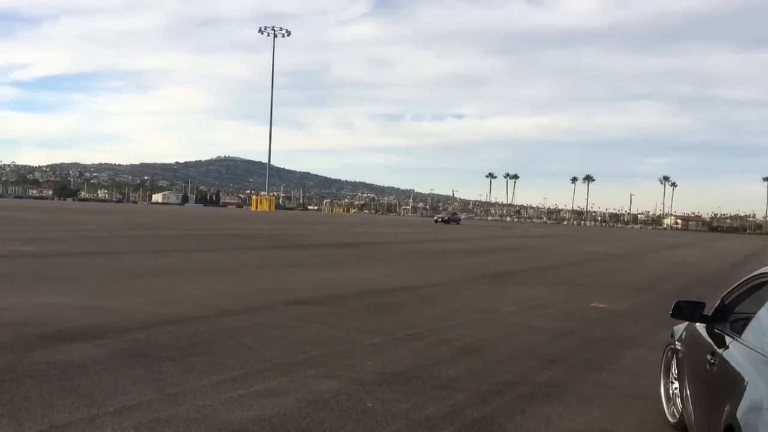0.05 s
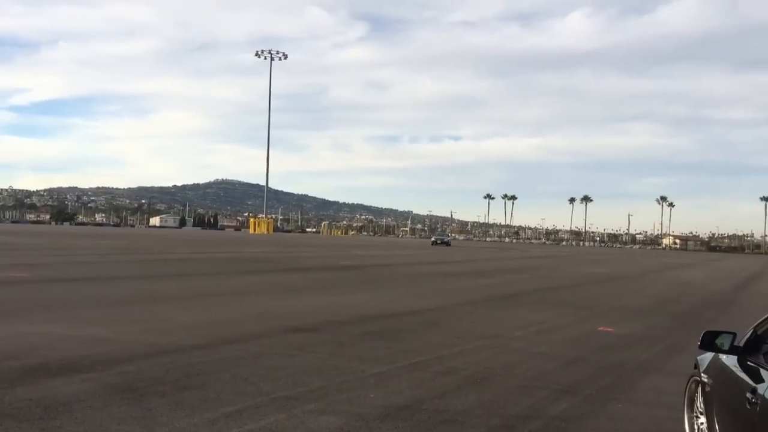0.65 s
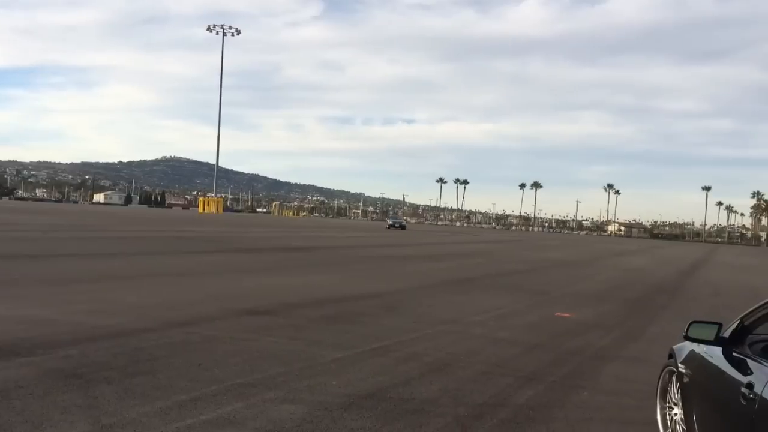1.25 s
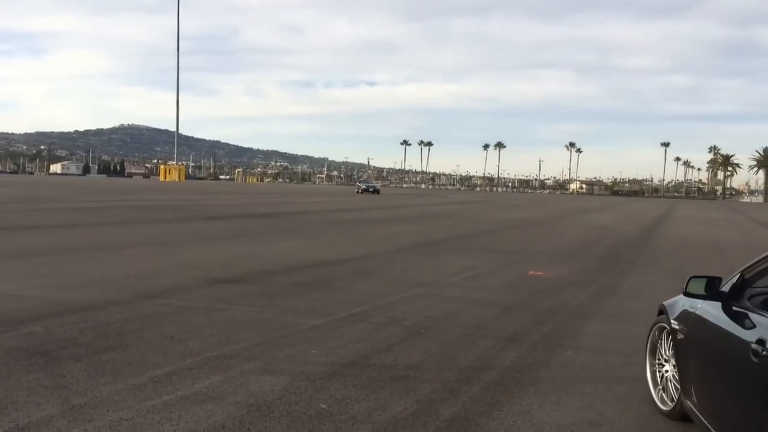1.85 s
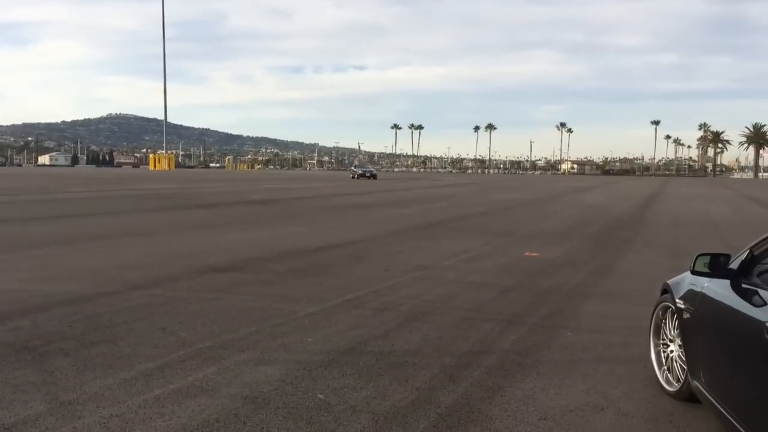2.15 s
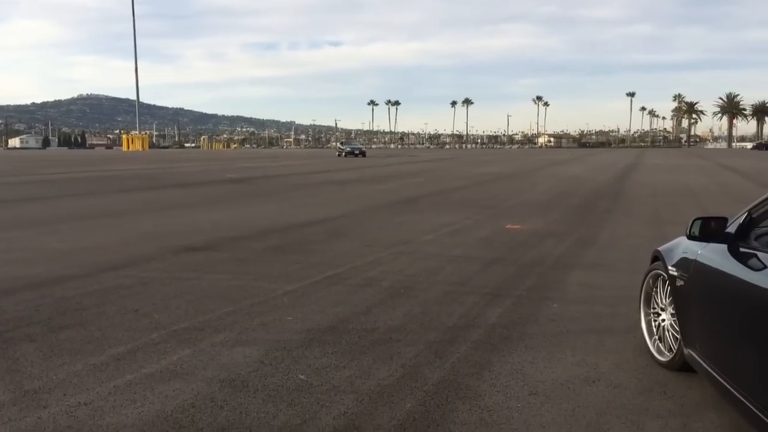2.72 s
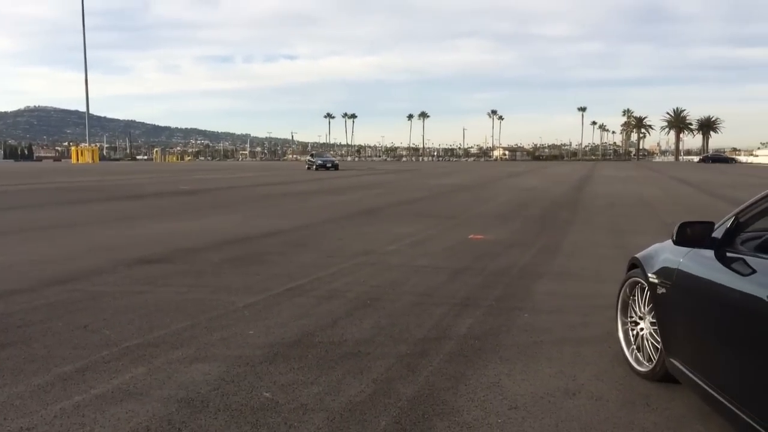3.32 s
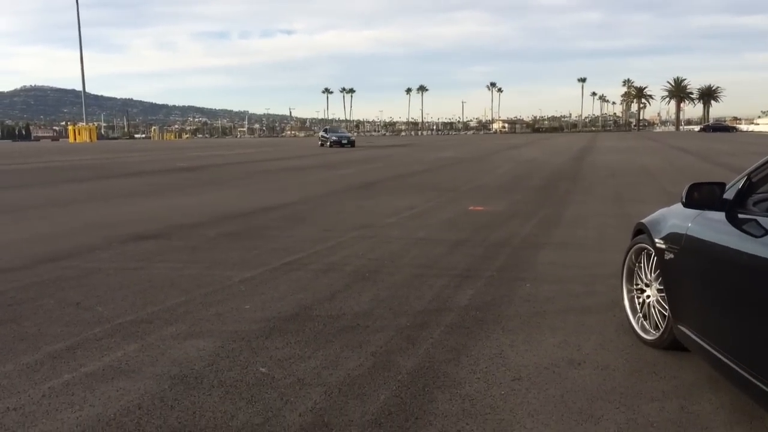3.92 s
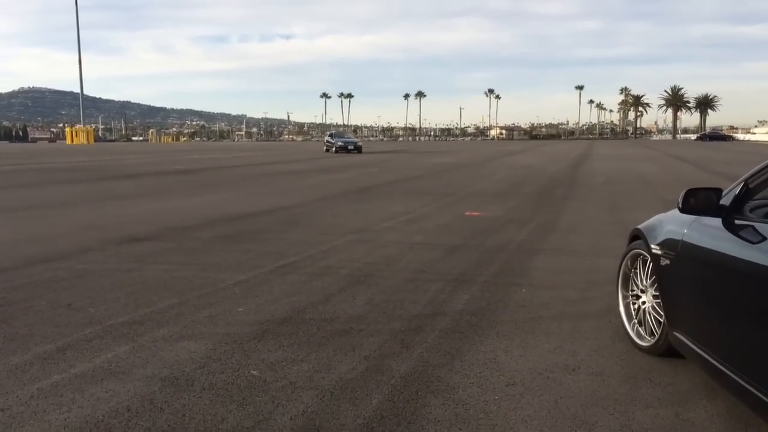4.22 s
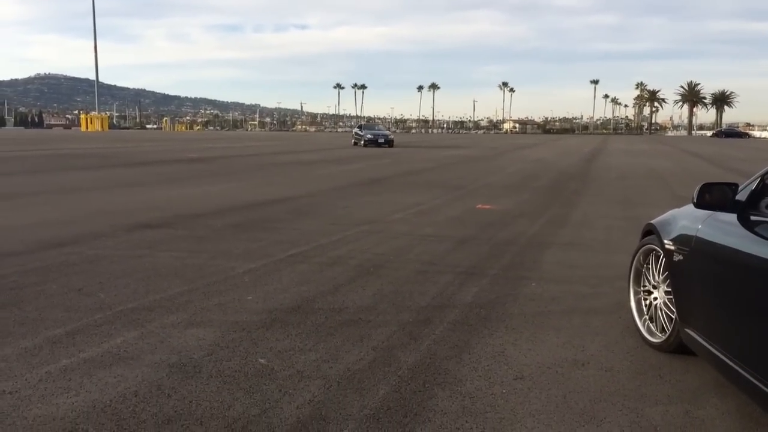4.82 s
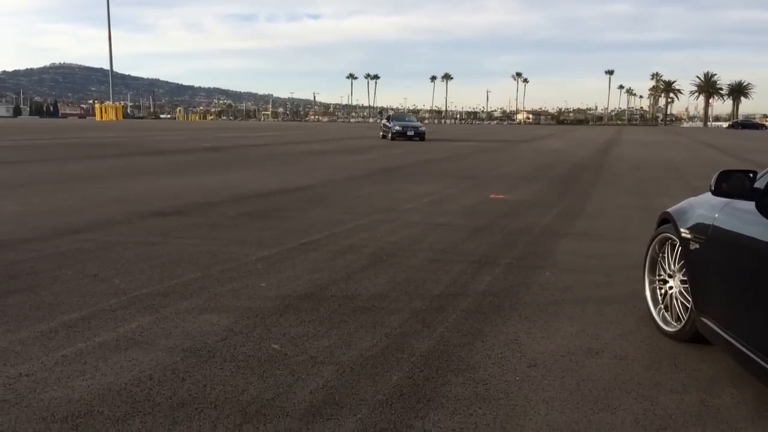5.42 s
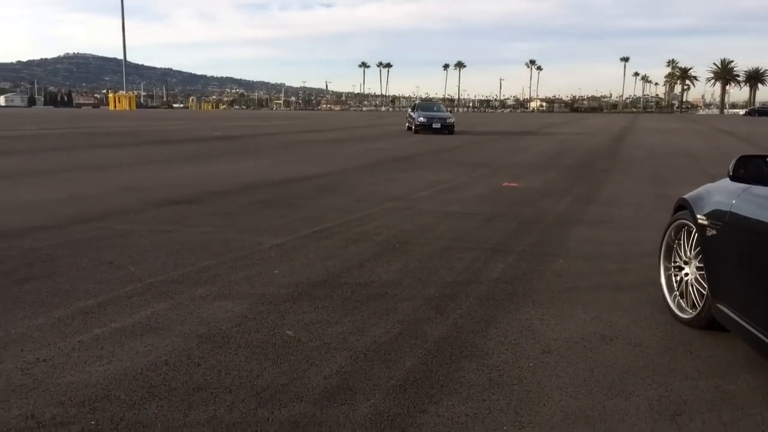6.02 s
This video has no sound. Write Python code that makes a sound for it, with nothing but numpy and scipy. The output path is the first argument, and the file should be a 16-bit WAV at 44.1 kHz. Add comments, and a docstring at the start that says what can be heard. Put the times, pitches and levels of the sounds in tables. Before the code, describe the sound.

A V8 car with open exhaust pipes approaches across a wide asphalt lot, over soft outdoor air and a deep hum. For the first second it is distant, with a ragged, lumpy low rumble. Dull thuds dot the rumble throughout. From about 1.2 seconds the engine revs up quickly, then climbs more slowly from 2 to 5 seconds, its note booming and growing louder. Exhaust rasp, clatter and metallic ringing build as it nears. Tyre and intake hiss come forward from about 3.5 seconds, and two faint, thin whistles swell and fade around 3.6 and 4.2 seconds. Tiny scuffs occur close to the microphone near 1 and 3 seconds, with a much clearer one at 4.7 seconds. Just after 5 seconds the throttle eases, picks up briefly and eases again, with the car still loud at the end, around 6 seconds.

```python
"""A V8 car with open pipes drives across a wide asphalt lot towards the listener, revs up, then eases off.
Its firing note booms as it sweeps through the pipe resonances, over a lumpy rumble with dull thuds.
Rasp, clatter, metallic ringing and tyre and intake hiss grow as it nears; two thin whistles come and go.
A few short scuffs stick and slip close to the microphone. Behind it all lie open air and a deep hum."""
import sys
import numpy as np
from scipy import signal
from scipy.fft import rfft, irfft, next_fast_len
from scipy.io import wavfile
from scipy.ndimage import uniform_filter1d, map_coordinates

SR = 44100
rng = np.random.default_rng(int(sys.argv[2]) if len(sys.argv) > 2 else 0)


def store_wav(level_fs):
    """Save 16-bit WAV to argv[1]."""
    pcm = np.round(np.clip(np.atleast_2d(level_fs), -1, 1) * 32767)
    wavfile.write(sys.argv[1], SR, pcm.T.astype(np.int16))


N = 267687
TIME = np.arange(N) / SR


def from_db(db):
    return 10 ** (np.asarray(db) / 20)


def rms_one(x):
    return x / np.sqrt(np.mean(x ** 2) + 1e-20)


def automation(curve):
    """A breakpoint curve, read at every sample."""
    return np.interp(TIME, *np.transpose(curve))


def gain_at(spectrum, hz):
    """Gain of an EQ curve, read on a log-frequency axis."""
    points_hz, points_db = np.transpose(spectrum)
    return from_db(np.interp(np.log(hz + 1e-3), np.log(points_hz), points_db))


def coloured(x, spectrum):
    """A sound shaped by an EQ curve; rms 1."""
    size = next_fast_len(N)
    gain = gain_at(spectrum, np.fft.rfftfreq(size, 1 / SR))
    return rms_one(irfft(rfft(x, size) * gain, size)[:N])


def drift(rate):
    """Smooth random modulation that changes `rate` times a second; rms 1."""
    knots = rng.standard_normal(2048)
    coarse_s = np.linspace(0, TIME[-1], 4000)
    curve = map_coordinates(knots, [coarse_s * rate], order=3, mode="wrap")
    return np.interp(TIME, coarse_s, rms_one(curve))


def steadied(x, span_s):
    """A leveller: evens out swells slower than the span."""
    return x / np.sqrt(uniform_filter1d(x ** 2, int(span_s * SR)) + 1e-9)


# colour of the air bed: (frequency [Hz], level [dB])
AIR_EQ = [(100, 17.5), (500, 19), (1000, 5), (2000, 1), (4000, -10), (7000, -8.5), (10000, -11),
          (15000, -14)]
def open_air(level_db):
    """A steady, dark bed of outdoor noise."""
    return from_db(level_db) * coloured(rng.standard_normal(N), AIR_EQ)


def deep_hum(hz, level_db):
    """A low sine that wavers in level and phase."""
    gain = np.sqrt(2) * from_db(level_db + 2.8 * drift(4.2))
    return gain * np.sin(2 * np.pi * hz * TIME + 0.73 * drift(7.7))


# colour of the grit: (frequency [Hz], level [dB])
GRIT_EQ = [(300, 1.5), (700, 15), (1050, 20), (2000, 2), (3500, 6.5), (5000, -2.5), (7000, -2.5),
           (10000, -16.5), (15000, -18)]
# scuff cues: (middle [s], level [dB], half length [s], centre [Hz], grit mix [dB], slip rate [1/s])
SCUFF_CUES = [(0.97, -49, 0.0076, 1360, -18, 68), (1.132, -54, 0.0058, 2210, -0.5, 110),
              (2.941, -60, 0.0052, 2430, -3, 110), (3.014, -65.5, 0.0078, 2560, 12.5, 110),
              (4.281, -59, .0031, 2950, 10, 110), (4.667, -28.5, 0.013, 1660, -7, 110)]
def scuffs(band_ratio, slip_depth):
    """Short runs of stick and slip: a steep-sided resonance with gritty hiss around it."""
    out, white = np.zeros(N), rng.standard_normal(N)
    grit = coloured(rng.standard_normal(N), GRIT_EQ) * from_db(0.5 * drift(340))
    for middle_s, level_db, half_s, hz, grit_db, slips_per_s in SCUFF_CUES:
        band = signal.butter(4, [hz / band_ratio, hz * band_ratio], "band", fs=SR, output="sos")
        body = steadied(signal.sosfilt(band, white), span_s=0.0091)
        near = np.abs(TIME - middle_s) < 0.1
        t = TIME[near] - middle_s
        swell = np.exp(-(t / (2 * half_s)) ** 4)
        slips = 1 + slip_depth * np.cos(2 * np.pi * slips_per_s * t)
        out[near] += from_db(level_db) * swell * slips * (body[near] + from_db(grit_db) * grit[near])
    return out


# dull hits in the rumble: (time [s], level [dB])
THUD_CUES = [(0.023, -7), (0.259, -7), (0.597, -6), (.737, -9), (0.924, -10.5), (1.093, -10.5), (1.57, -12),
             (1.905, -7.5), (2.075, -9.5), (2.717, -12.5), (3.089, -19), (4.388, -10), (4.594, -10),
             (5.199, -22.5), (5.275, -11), (5.593, -12.5), (5.889, -11)]
def thuds(hz, t60_s, rise_s):
    """Each thud is a cycle or two of a low, heavily damped swing."""
    out = np.zeros(N)
    for start_s, level_db in THUD_CUES:
        pitch_hz = hz * (1 + 0.038 * rng.standard_normal())
        near = (TIME > start_s) & (TIME < start_s + 0.2)
        age = TIME[near] - start_s
        envelope = 2 * (1 - np.exp(-age / rise_s)) * from_db(level_db - 60 * age / t60_s)
        out[near] += envelope * np.sin(2 * np.pi * pitch_hz * age)
    return out


# the revs: (time [s], engine speed [four-stroke cycles/s])
REVS = [(0, 11.55), (1.2, 12.83), (1.5, 15.8), (2, 19.24), (2.5, 20.26), (3.2, 21.97), (3.85, 22.98),
        (5.07, 24.15), (5.3, 22.81), (5.48, 23.75), (5.7, 23.24), (6.07, 23.05)]
def crank(wobble):
    """Engine cycles turned so far; the speed is never quite steady."""
    return np.cumsum(automation(REVS) * (1 + wobble * drift(14))) / SR


def surge(hard_cycles_per_s2=11.6):
    """How fast the revs are changing, up or down; 1 in a hard surge."""
    change = np.abs(np.gradient(automation(REVS))) * SR
    return uniform_filter1d(change, SR // 8) / hard_cycles_per_s2


def raggedness(smooth_cycles_per_s=20.5, span_cycles_per_s=5.3):
    """Low revs fire raggedly: 0 when smooth, 1 when fully ragged."""
    return np.clip((smooth_cycles_per_s - automation(REVS)) / span_cycles_per_s, 0, 1)


START_M, CLOSING_M_PER_S = 102.5, 12.4
# the driver's foot: (time [s], throttle [0-1])
PEDAL = [(0, 0), (1.15, 0.35), (1.85, 0.92), (2.4, 0.88), (3.0, 0.76), (3.4, 0.72), (3.8, 0.96),
         (4.9, 0.88), (5.3, 0.52), (5.85, 0.72), (6.07, 0.3)]
def approach_gain(fader):
    """A layer's fader ride: it grows as the car nears and as the throttle opens."""
    far_db, halving_db, throttle_db = fader
    halvings = np.log2(START_M / (START_M - CLOSING_M_PER_S * TIME))
    return from_db(far_db + halving_db * halvings + throttle_db * automation(PEDAL))


def cycle_buzz(cycles, morph_rate, size=4096):
    """A pressure pattern that repeats each engine cycle and slowly morphs: a comb of engine orders."""
    out = 0
    for _ in range(4):
        pattern = irfft(np.exp(2j * np.pi * rng.random(size // 16)), size)
        out += drift(morph_rate) * np.interp(cycles % 1 * size, np.arange(size), pattern)
    return steadied(out, span_s=0.51)


def engine_band(cycles, spectrum, buzz_db, throb):
    """Engine orders plus turbulence that puffs at each firing and swells twice a cycle; rms 1."""
    puffs = 1 + throb * (np.cos(2 * np.pi * 8 * cycles) / 2 + np.cos(2 * np.pi * 2 * cycles))
    rush = coloured(rng.standard_normal(N) * puffs, spectrum)
    buzz = coloured(cycle_buzz(cycles, morph_rate=1.59), spectrum)
    return rms_one(rush + from_db(buzz_db) * buzz)


# whistle cues: (middle [s], half length [s], engine order [per cycle])
WHISTLE_CUES = [(3.58, .19, 180), (4.15, .22, 144)]
def whistles(cycles, level_db):
    """Thin, slightly shaky whistles that swell and fade while rising with the revs."""
    out, shake = 0, 0.8 * drift(40)
    for middle_s, half_s, order in WHISTLE_CUES:
        swell = np.exp(-0.5 * ((TIME - middle_s) / half_s) ** 2)
        out += swell * np.sin(2 * np.pi * order * cycles + shake)
    return from_db(level_db) * out


# colour of the hiss: (frequency [Hz], level [dB])
HISS_EQ = [(1500, -15), (2800, -6), (3270, -2.5), (3650, 1), (4200, -1.5), (5200, -10), (6600, -9.5),
           (8200, -16), (11000, -21.5), (15000, -37)]
# its fader ride: (time [s], level [dB])
HISS_RIDE = [(0, -73), (1.1, -69.5), (2.4, -66), (3.25, -67), (3.7, -57.5), (4.0, -56), (4.5, -59),
             (4.9, -55.5), (5.35, -56.5), (5.85, -52), (6.07, -53.5)]
def tyre_and_intake_hiss(cycles):
    """Bright rushing noise with a trace of engine buzz."""
    return from_db(automation(HISS_RIDE)) * engine_band(cycles, HISS_EQ, buzz_db=-5, throb=0.04)


# metal resonances: (centre [Hz], width [Hz], level [dB])
METAL_MODES = [(1765, 140, -3), (2236, 170, -11), (3260, 250, -12.5)]
# their fader: (level afar [dB], boost per halved distance [dB], boost at full throttle [dB])
RINGING_FADER = (-75.5, 10.1, 14.5)
def metal_ringing(cycles, noise_mix):
    """Engine orders and noise shake a few narrow resonances."""
    shake = cycle_buzz(cycles, morph_rate=2.2) + noise_mix * rng.standard_normal(N)
    out = 0
    for hz, width_hz, level_db in METAL_MODES:
        band = signal.butter(2, [hz - width_hz / 2, hz + width_hz / 2], "band", fs=SR, output="sos")
        out += from_db(level_db) * steadied(signal.sosfilt(band, shake), span_s=0.13)
    return approach_gain(RINGING_FADER) * out


# colour of the clatter: (frequency [Hz], level [dB])
CLATTER_EQ = [(600, -17.5), (1050, 2.5), (1300, 0), (1550, -2.5), (1800, -6.5), (2030, -4), (2300, -10.5),
              (2750, -12.5), (3300, -21.5), (5000, -32)]
# its fader: (level afar [dB], boost per halved distance [dB], boost at full throttle [dB])
CLATTER_FADER = (-66, 5.76, 8)
def engine_clatter(cycles):
    """Hard midrange, about equal parts buzz and noise, that comes forward under throttle."""
    return approach_gain(CLATTER_FADER) * engine_band(cycles, CLATTER_EQ, buzz_db=0.5, throb=0.079)


# colour of the rasp: (frequency [Hz], level [dB])
RASP_EQ = [(150, -19), (290, 3), (370, 2), (460, 2.5), (580, -0.5), (760, -3.5), (1080, -8.5),
           (1500, -18.5), (2500, -36.5), (5000, -61)]
# body and top faders: (level afar [dB], boost per halved distance [dB], boost at full throttle [dB])
RASP_BODY_FADER = (-48.5, 1.2, 1)
RASP_TOP_FADER = (-53, 6.3, 5.7)
def exhaust_rasp(cycles, crossover_hz):
    """Buzzy exhaust puffs whose top opens up as the car nears and the throttle opens."""
    rasp = engine_band(cycles, RASP_EQ, buzz_db=2, throb=0.22)
    body = signal.sosfilt(signal.butter(3, crossover_hz, "low", fs=SR, output="sos"), rasp)
    top = signal.sosfilt(signal.butter(3, crossover_hz, "high", fs=SR, output="sos"), rasp)
    return approach_gain(RASP_BODY_FADER) * body + approach_gain(RASP_TOP_FADER) * top


# colours of the rumble and the burble: (frequency [Hz], level [dB])
RUMBLE_EQ = [(15, -31.5), (30, -24.5), (41, -7), (52, -4), (70, 1), (90, 4), (115, 1.5), (145, 2.5),
             (180, -11.5), (240, -16.5), (400, -72.5)]
BURBLE_EQ = [(90, -28.5), (135, -4), (180, 4), (212, -3), (255, -2), (285, -5.5), (340, -20), (600, -57.5)]
# the rumble's fader ride: (time [s], level [dB])
RUMBLE_RIDE = [(0, -42), (.95, -33), (2.08, -32.5), (2.35, -37), (3.0, -34), (3.45, -29), (3.75, -37),
               (4.15, -30), (4.58, -30), (4.8, -37), (5.28, -25), (5.42, -33), (5.9, -28), (6.07, -29.5)]
def rumble_and_burble(cycles, steady_db, surge_db, ragged_db):
    """Lumpy low end under the pitched burble of the pipes, which swells at low or changing revs."""
    rumble = steadied(engine_band(cycles, RUMBLE_EQ, buzz_db=-5, throb=0.2), span_s=0.068)
    burble = steadied(engine_band(cycles, BURBLE_EQ, buzz_db=7, throb=0.2), span_s=0.08)
    rumble_db = automation(RUMBLE_RIDE) + 2 * drift(16)
    burble_db = steady_db + surge_db * surge() + ragged_db * raggedness()
    return from_db(rumble_db) * rumble + from_db(burble_db) * burble


# exhaust partials; 8 is the firing note, the rest come from the uneven banks: (engine order [per cycle])
ORDERS = (7, 8, 9, 10, 11, 13, 15, 21)
# their mix going into the pipes: (level [dB])
ORDER_MIX = (-11, 0.5, -2.5, -7, -3.5, -4.5, -4.5, -7.5)
# resonances of the open pipes: (frequency [Hz], gain [dB])
PIPE_EQ = [(85, -10.5), (100, -3), (118, -11.5), (152, -11.5), (168, -6.5), (184, 1.1), (194, 1.5),
           (206, -9.5), (232, -21), (255, -13), (275, -20), (305, -38.5), (415, -33.5), (458, -14.5),
           (490, -29.5)]
# the notes' fader: (level afar [dB], boost per halved distance [dB], boost at full throttle [dB])
NOTE_FADER = (-30, 6.46, 0.1)
def exhaust_notes(cycles, flutter_db, growl_db, overtone_db, coasting_loss_db):
    """The firing note and its neighbours beat once a cycle and boom as they cross the pipe resonances."""
    revs, throttle, ragged = automation(REVS), automation(PEDAL), raggedness()
    cycles = cycles + 0.032 * ragged * drift(24.99)  # ragged firing jitters the timing

    def note(order, level_db):
        upper = np.clip((order - 9) / 2, 0, 1)  # upper orders duck as the throttle shuts
        duck_db = upper * coasting_loss_db * (1 - throttle)
        waver_db = (flutter_db + 3.8 * ragged) * drift(22) - ragged
        gain = from_db(level_db - duck_db + waver_db) * gain_at(PIPE_EQ, order * revs)
        return gain * np.sin(2 * np.pi * (order * cycles + rng.random()))

    out = sum(note(order, level_db) for order, level_db in zip(ORDERS, ORDER_MIX))
    out += surge() * (note(16, growl_db) + note(17, growl_db))  # growl only while the revs change
    overtone = gain_at(PIPE_EQ, 8 * revs) * np.sin(2 * np.pi * 36 * cycles)  # swells with the firing note
    out += from_db(overtone_db + 3 * drift(8)) * overtone
    return np.sqrt(2) * approach_gain(NOTE_FADER) * out


def scene():
    """Mono mix: the car's layers, locked to one crank, with thuds, scuffs, hum and air."""
    cycles = crank(wobble=0.001042)
    car = exhaust_notes(cycles, flutter_db=1.24, growl_db=4, overtone_db=-38, coasting_loss_db=8.5)
    car += rumble_and_burble(cycles, steady_db=-43, surge_db=7, ragged_db=4.5)
    car += exhaust_rasp(cycles, crossover_hz=660) + engine_clatter(cycles)
    car += tyre_and_intake_hiss(cycles) + whistles(cycles, level_db=-61)
    car += metal_ringing(cycles, noise_mix=2)
    spot_effects = thuds(hz=89, t60_s=0.053, rise_s=0.01) + scuffs(band_ratio=1.3, slip_depth=0.68)
    bed = deep_hum(hz=42.1, level_db=-46) + open_air(level_db=-54)
    return (car + spot_effects + bed)[None]


def record(dry):
    """The microphone drops the deepest bass; the top is cut steeply."""
    low_cut = signal.butter(2, 26, "high", fs=SR, output="sos")
    high_cut = signal.ellip(10, 0.1, 90, 15300, fs=SR, output="sos")
    return signal.sosfilt(high_cut, signal.sosfilt(low_cut, dry))


dry = scene()
out = record(dry)
store_wav(out)
```